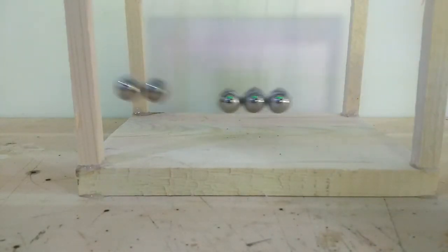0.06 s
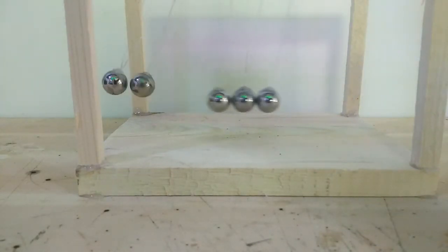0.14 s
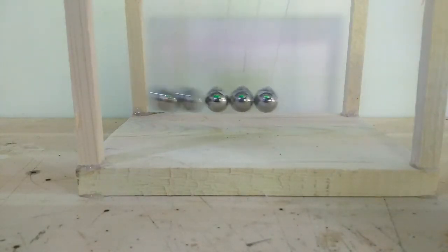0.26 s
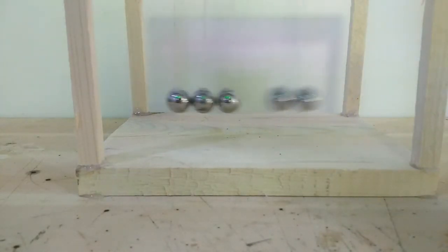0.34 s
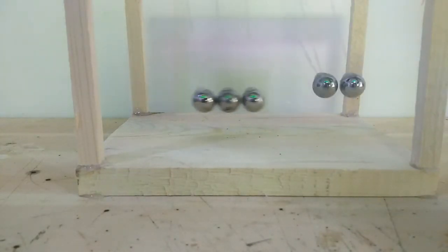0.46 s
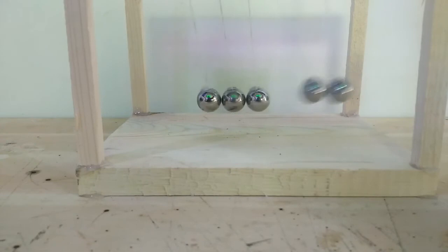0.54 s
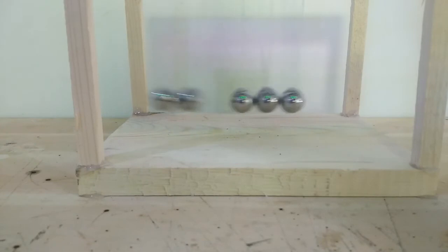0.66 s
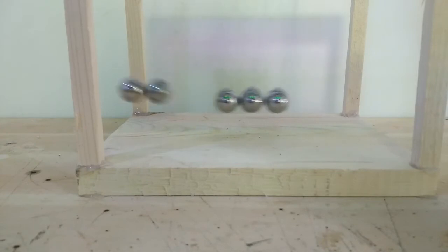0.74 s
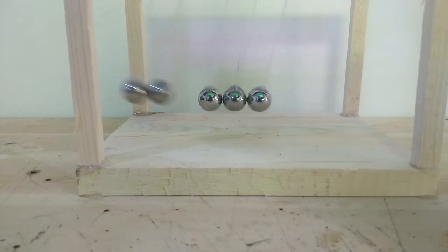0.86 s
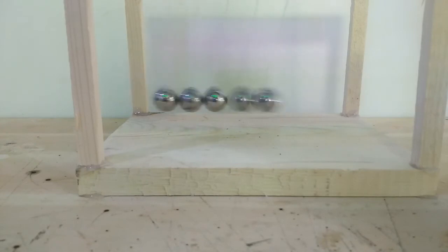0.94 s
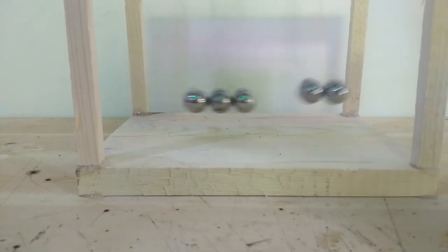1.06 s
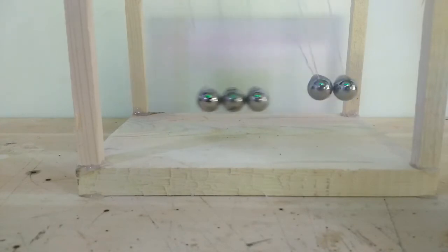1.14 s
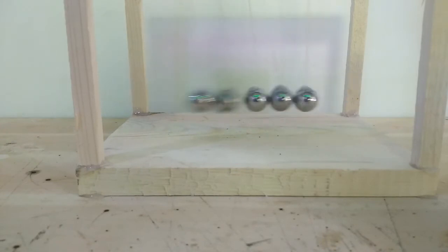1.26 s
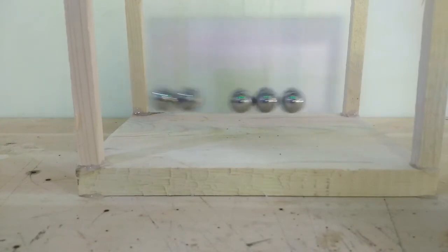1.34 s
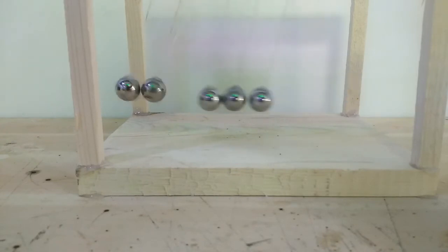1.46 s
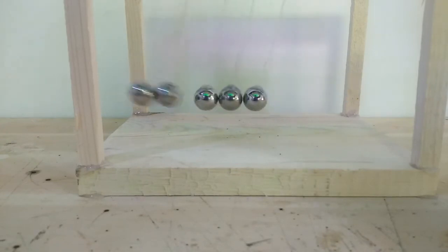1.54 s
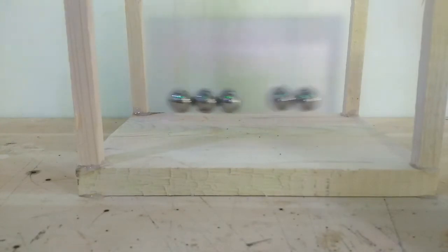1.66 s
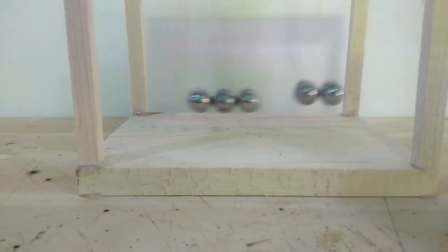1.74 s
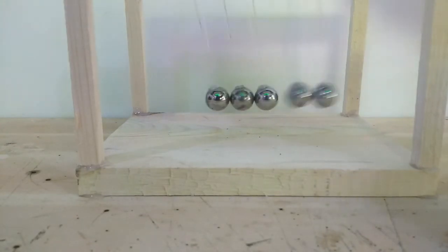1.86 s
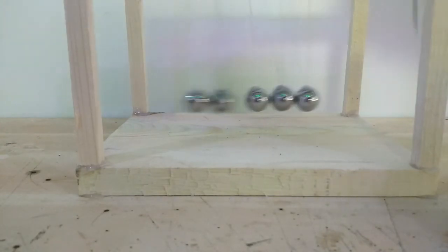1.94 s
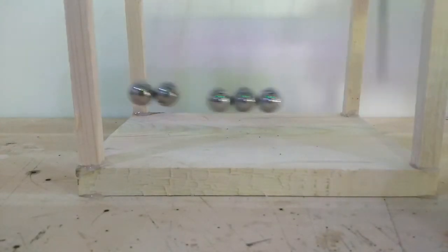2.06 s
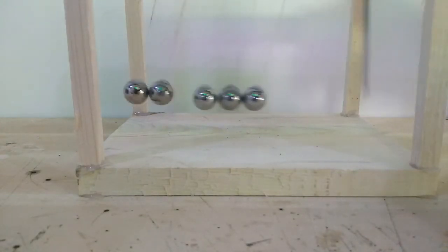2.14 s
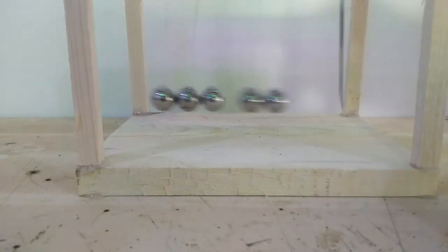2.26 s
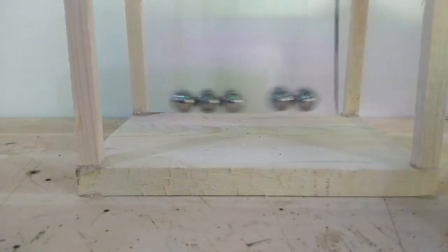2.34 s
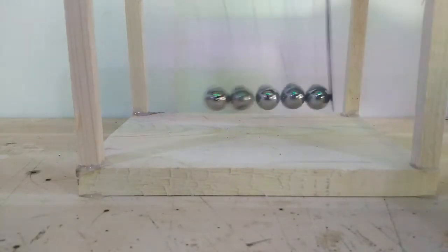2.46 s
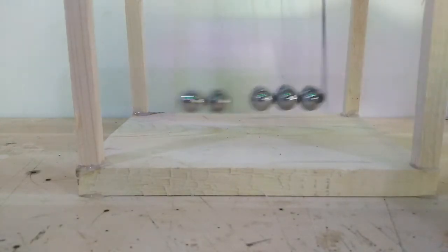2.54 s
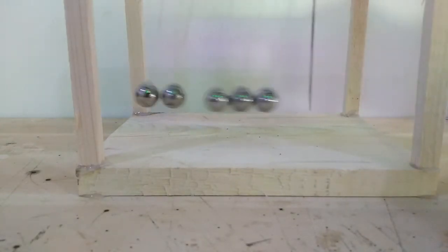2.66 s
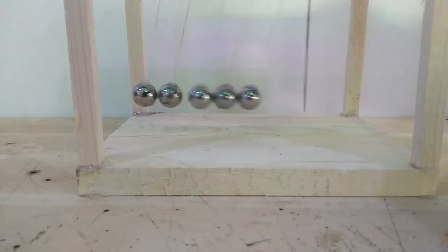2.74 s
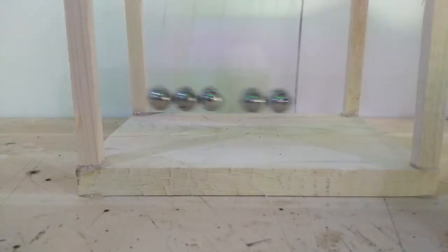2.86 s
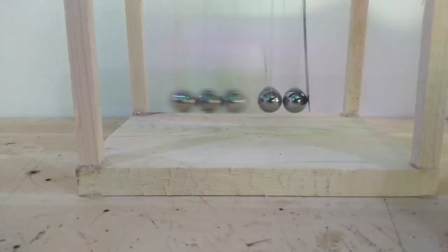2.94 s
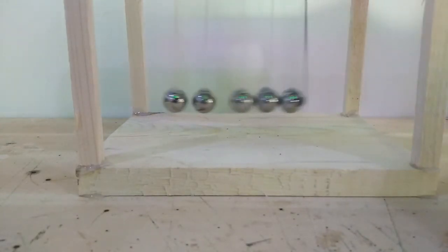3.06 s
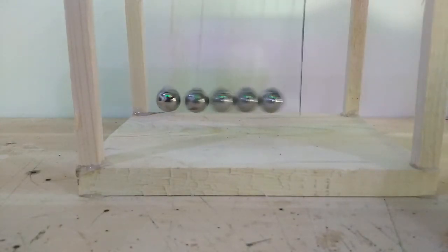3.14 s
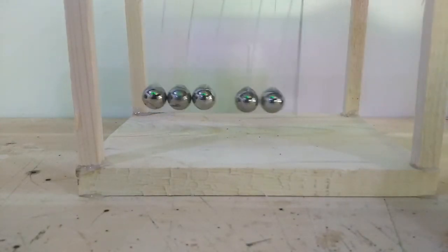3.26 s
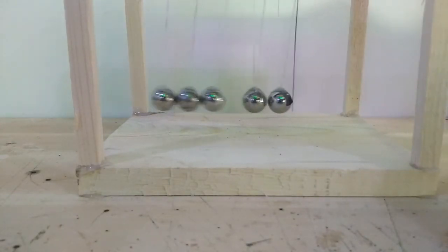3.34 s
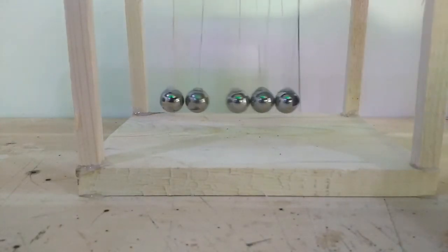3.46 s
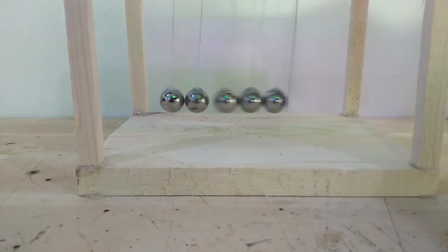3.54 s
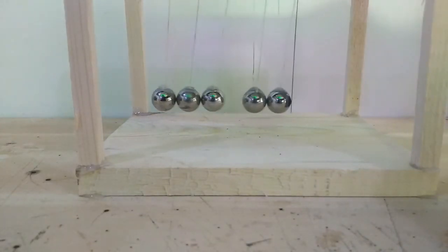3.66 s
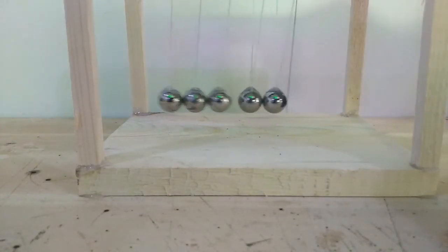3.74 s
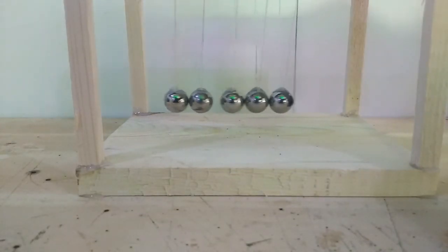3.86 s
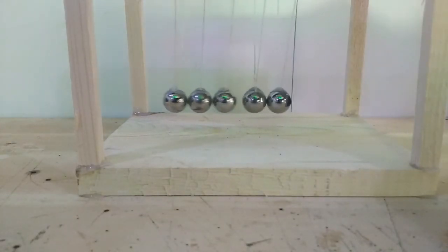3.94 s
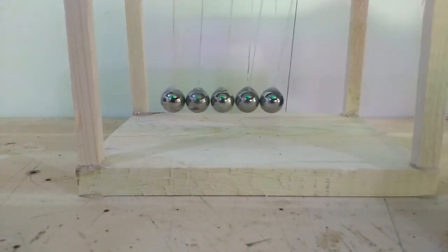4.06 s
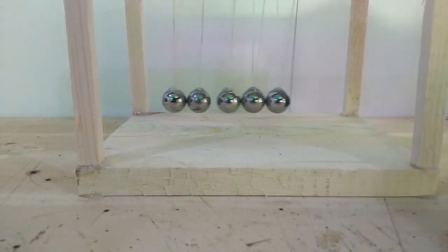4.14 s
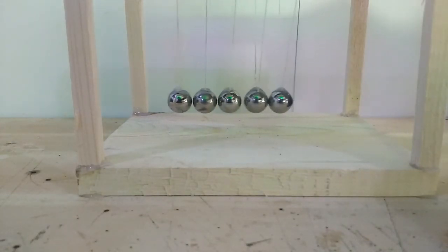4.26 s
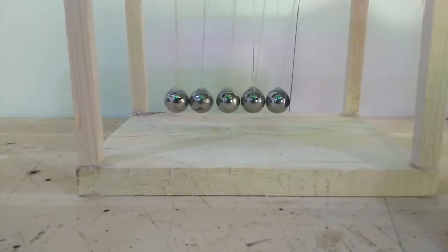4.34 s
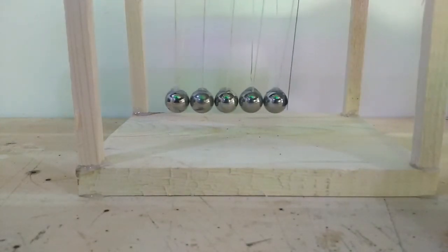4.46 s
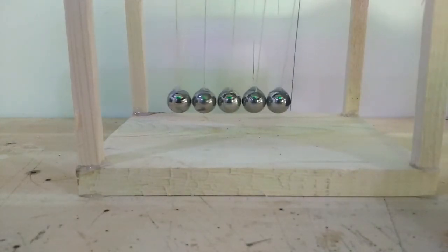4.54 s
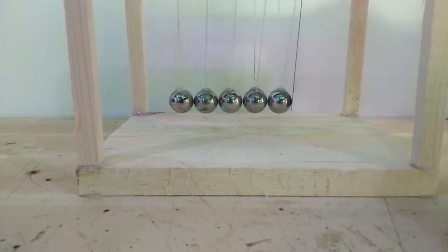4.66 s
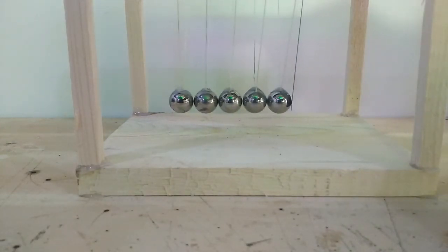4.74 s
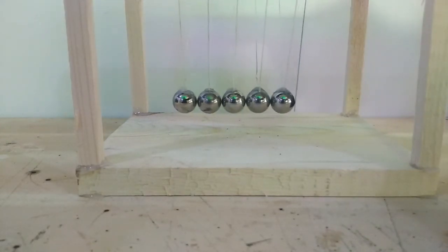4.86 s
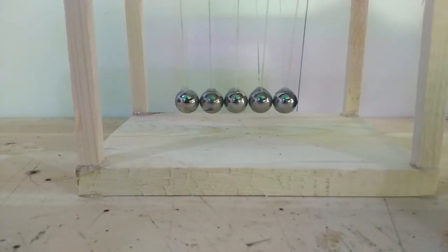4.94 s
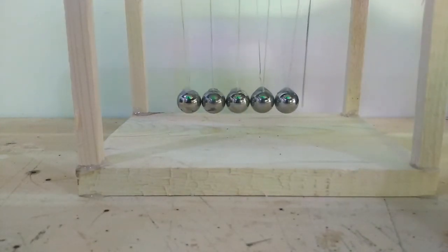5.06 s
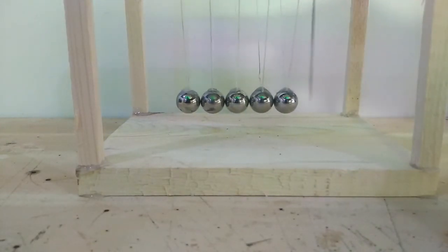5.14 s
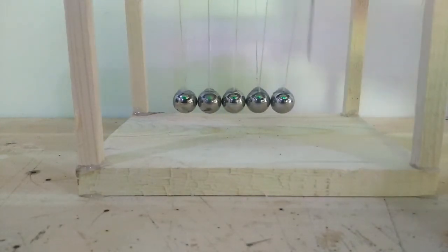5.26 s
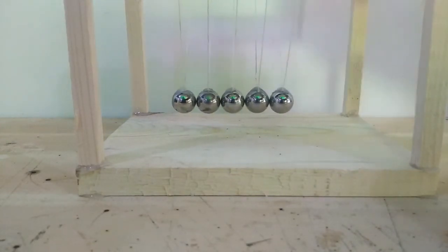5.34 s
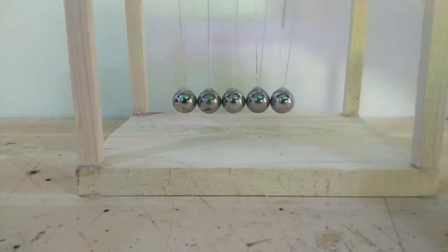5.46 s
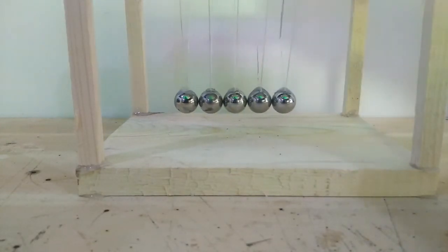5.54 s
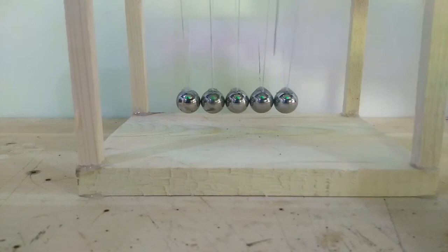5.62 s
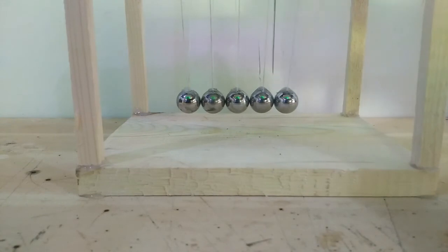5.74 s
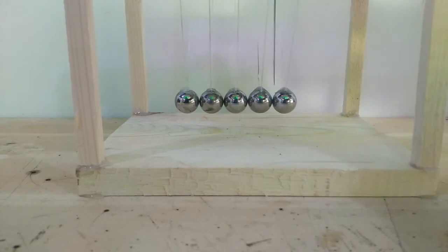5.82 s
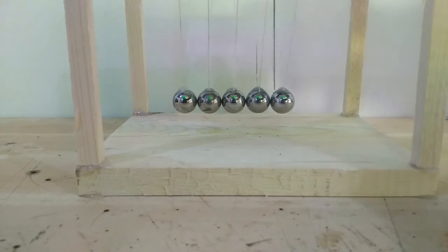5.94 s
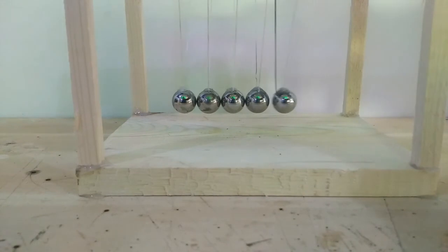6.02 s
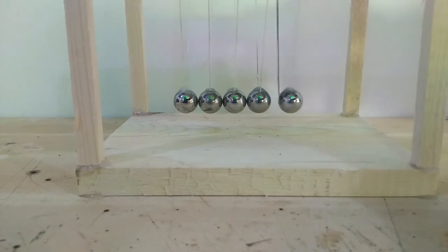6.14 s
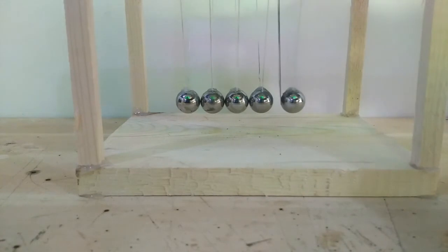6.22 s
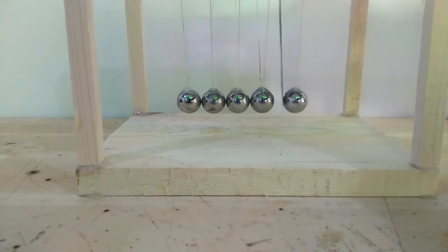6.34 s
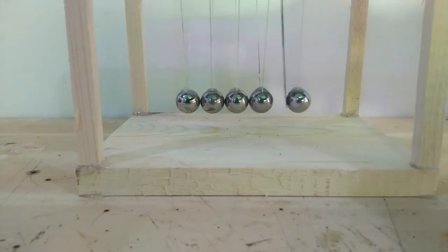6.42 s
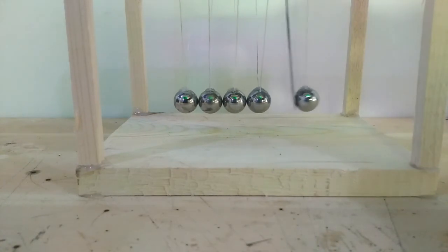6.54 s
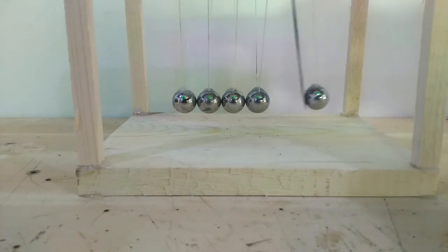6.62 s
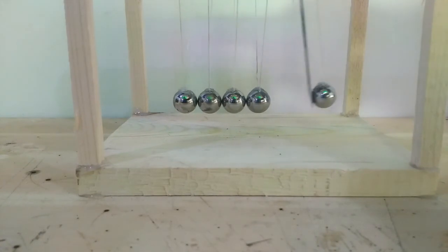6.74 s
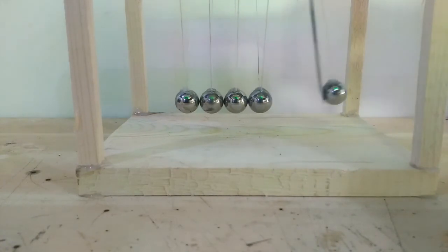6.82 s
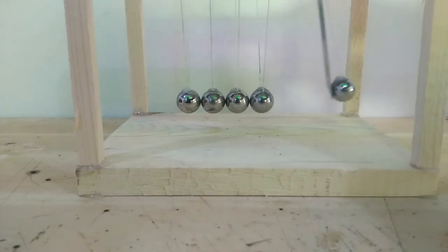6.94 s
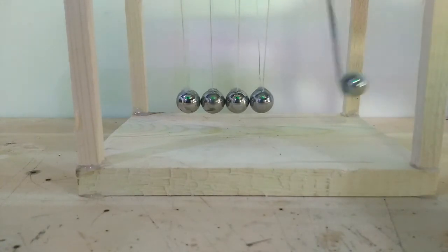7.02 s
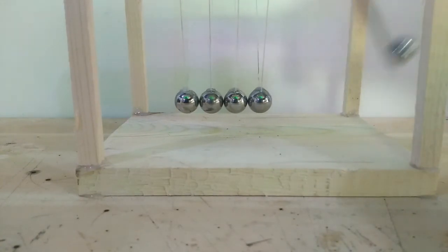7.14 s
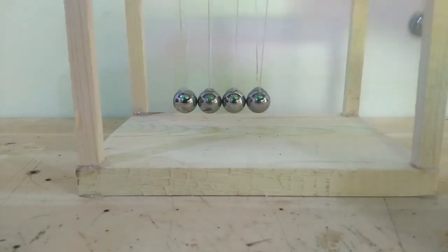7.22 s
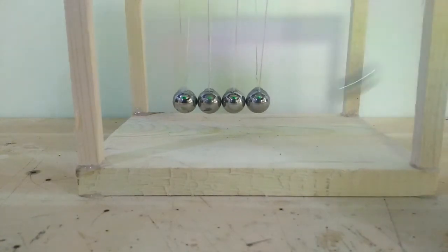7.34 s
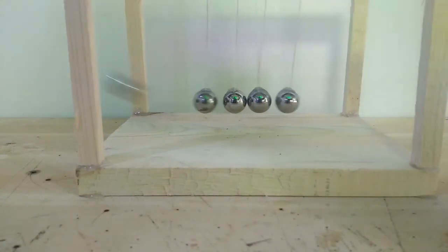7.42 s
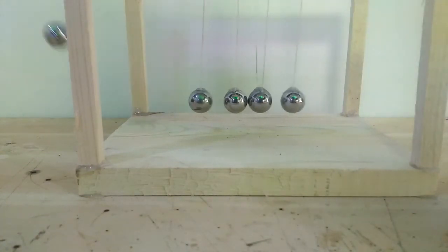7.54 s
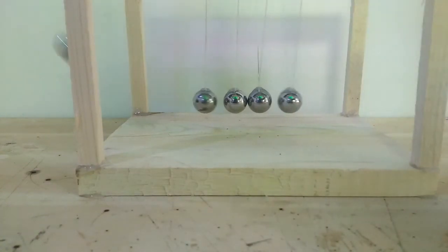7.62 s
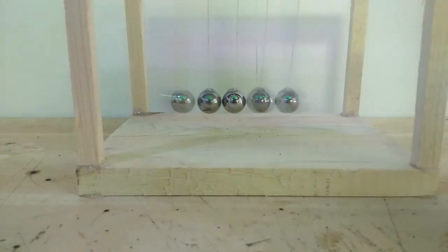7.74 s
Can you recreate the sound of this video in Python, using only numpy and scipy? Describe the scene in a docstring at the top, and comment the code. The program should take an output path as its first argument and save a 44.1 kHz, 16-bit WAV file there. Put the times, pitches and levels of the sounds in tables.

```python
"""A Newton's cradle on a wooden frame clacks on a workbench in a small room, close to the left microphone.
It first swings freely: each collision is a noisy run of steel contacts, then chatter, ringing and a short tail.
A hand stops the swing, bumping the rumbling frame; the balls jostle in irregular knocks and settle.
Last, fingers scrape and rub softly as one ball is lifted and let go, and it knocks again.
Filtered noise gives the contacts, wood, skin and air; decaying sines give the ring."""
import sys
import numpy as np
from scipy import signal
from scipy.fft import rfft, irfft, next_fast_len
from scipy.io import wavfile

SR = 44100
rng = np.random.default_rng(int(sys.argv[2]) if len(sys.argv) > 2 else 0)


def dump(signal):
    """Clip the signal to [-1, 1] and save it as 16-bit WAV at the path in sys.argv[1]."""
    limited = np.clip(np.atleast_2d(signal).T, -1, 1)
    pcm = np.round(limited * 32767).astype(np.int16)
    wavfile.write(sys.argv[1], SR, pcm)


N = 343539
TOP_HZ = 14300  # upper edge of the recorder's passband


def undb(db):
    """Logarithmic level: 20 dB is a factor of ten in amplitude."""
    return 10 ** (np.asarray(db) / 20)


def unit(x):
    """Energy normalisation: the squared samples sum to one."""
    return x / np.sqrt(np.sum(x ** 2) + 1e-18)


def fade(t, t60):
    """Exponential decay: the amplitude falls by 60 dB in t60 seconds."""
    return np.exp(-np.log(1000) * t / t60)


def curve(hz, points):
    """Logarithmic frequency scale: interpolate (Hz, value) points along it."""
    f, value = np.transpose(points)
    return np.interp(np.log(hz + 1), np.log(f), value)


def colour(x, points):
    """Minimum phase: a causal filter derived by cepstrum from the gain of (Hz, dB) points."""
    n = next_fast_len(len(x) + 2048, real=True) * 2
    hz = np.arange(n // 2 + 1) * SR / n
    cepstrum = irfft(np.log(undb(curve(hz, points))))
    # fold the cepstrum onto positive time to make the filter causal
    cepstrum[1:n // 2] *= 2
    cepstrum[n // 2 + 1:] = 0
    response = np.exp(rfft(cepstrum))
    return irfft(rfft(x, n) * response)[:len(x)]


def noise(points):
    """Spectral shaping: white noise is filtered, then scaled to rms 1."""
    return unit(colour(rng.standard_normal(N), points)) * np.sqrt(N)


def add(track, s, x):
    """Superposition: mix x into the track at s seconds."""
    i = int(s * SR)
    track[i:i + len(x)] += x[:N - i]


def swells(rows):
    """Power addition: events (start_s, level_db, rise_s, t60_s) that rise and die away share one envelope."""
    power = np.zeros(N)
    t = np.arange(SR) / SR
    for s, db, rise, t60 in rows:
        attack = np.minimum(t / rise, 1)
        decay = fade(np.maximum(t - rise, 0), t60)
        add(power, s, (undb(db) * attack * decay) ** 2)
    return np.sqrt(power)


# Spectral density of room air and microphone hiss: frequency_hz, left_db_per_hz, right_db_per_hz
AIR_DENSITY = [(30, -104.2, -110.9), (60, -92.5, -104.9), (95, -85.5, -100.0), (170, -85, -99.3),
               (382, -88, -100.5), (480, -90.5, -91), (1050, -95.5, -94.5), (2000, -97.5, -96.5),
               (4694, -101.4, -101.6), (4900, -106.8, -107.7), (9030, -109.9, -113.5),
               (13960, -111.3, -112.2)]


def air():
    """Uncorrelated steady noise: room air and hiss are independent in the two microphones."""
    rows = np.array(AIR_DENSITY)
    sides = [colour(rng.standard_normal(N), rows[:, [0, column]]) for column in (1, 2)]
    return np.array(sides) * np.sqrt(SR / 2)  # density to amplitude over the whole band


# Relative spectrum of rubbing skin: frequency_hz, gain_db
SKIN_COLOUR = [(100, -3.5), (300, -1), (1000, -7.5), (2000, -16), (5000, -23), (8300, -27), (14000, -30)]
# Fingers sliding off the ball: start_s, level_db, rise_s, t60_s
FINGER_RUBS = [(7.27, -65.5, .03, 0.68), (7.48, -51, 0.021, 0.38)]


def fingers():
    """Friction noise: skin rubs softly as the lifted ball is let go."""
    return noise(SKIN_COLOUR) * swells(FINGER_RUBS)


# Relative spectrum of the wooden frame: frequency_hz, gain_db
WOOD_COLOUR = [(25, -17.5), (72, -6.5), (87, 4.5), (102, -7), (120, -3), (135, -10.5), (151, 1),
               (190, -9.5), (420, -18.5), (700, -25), (1200, -23), (2000, -42)]
# Dull bumps of the hand on the frame: start_s, level_db, rise_s, t60_s
HAND_BUMPS = [(3.098, -38, 0.011, 0.35), (3.128, -35.5, 0.016, 0.72), (7.378, -47.5, 0.0077, 0.41)]


def frame(free_db=-41, held_db=-47, rise_s=.035, t60_s=0.55):
    """Structure-borne sound: wood rumbles as strings take up each blow, less once held, and at hand bumps."""
    free = [(s, db + free_db, rise_s, t60_s) for s, db, *_ in free_swing()]
    held = [(s, db + held_db, rise_s, t60_s) for s, db, *_ in HAND_KNOCKS]
    return swells(free + held + list(HAND_BUMPS)) * noise(WOOD_COLOUR)


def room(blow, t60_s=0.22, treble_t60_s=0.17, grain_db=3.5, size=50):
    """Reverberation: patchy reflections build a tail, new each time as the balls are never in the same place."""
    t = np.arange(SR // 3) / SR
    white = rng.standard_normal(len(t))
    low = signal.sosfiltfilt(signal.butter(4, 10500, fs=SR, output="sos"), white)
    # the level is redrawn every `size` samples
    steps = np.repeat(rng.standard_normal(len(t) // size + 1), size)[:len(t)]
    build_up = np.clip((t - .003) / 0.0027, 0, 1)
    decaying = low * fade(t, t60_s) + (white - low) * fade(t, treble_t60_s)
    tail = decaying * undb(grain_db * steps) * build_up
    # the walls hear the blow from all sides, which evens out much of its comb colour
    return unit(tail) + .6 * unit(signal.fftconvolve(tail, blow)[:len(t)])


def patchy(x, spread_db, count=30):
    """Interference: reflections cancel and reinforce at other pitches for every position of the balls."""
    hz = np.linspace(1000, TOP_HZ, count)
    return colour(x, np.c_[hz, spread_db * rng.standard_normal(count)])


# Metallic modes of the cradle: pitch_hz, level_db (before the common ring gain), t60_s
CRADLE_MODES = [(4130, -23, .1), (4530, -23, .1), (6810, -22, .11), (7560, -20, .12), (8130, -18, .11),
                (9620, -22, .1), (12300, -23, .09)]


def ring(x):
    """Modal resonance: convolution with decaying sines rings the short metallic modes of the cradle."""
    t = np.arange(SR // 3) / SR
    modes = np.zeros(len(t))
    for hz, db, t60 in CRADLE_MODES:
        modes += undb(db) * unit(np.sin(2 * np.pi * hz * t) * fade(t, t60))
    return signal.fftconvolve(x, modes)[:N]


def contacts(t, times, sizes, t60):
    """Impact scattering: hard ticks, each scattered at once by the neighbouring balls and the frame."""
    age = t - times[:, None]
    power = sizes[:, None] ** 2 * (age >= 0) * fade(np.abs(age), t60) ** 2
    return unit(np.sqrt(power.sum(0)) * rng.standard_normal(len(t)))


def collision(run_ms, chatter_db, count=6):
    """Momentum transfer: the blow swells as it runs down the row ball by ball; loosened balls then chatter."""
    t = np.arange(SR // 20) / SR
    k = np.arange(count)
    steps = (k + rng.uniform(0, .6, count) * (k > 0)) / count
    sizes = undb(2.1 * rng.standard_normal(count) - 1.7 * (k == 0))  # the first contact tends to be weaker
    blow = contacts(t, steps * run_ms / 1000, sizes, t60=.006)
    later = 0.0044 + 0.014 * (k + rng.random(count)) / count  # seconds
    chatter = contacts(t, later, undb(2.0 * rng.standard_normal(count)), t60=0.013)
    return unit(blow + undb(chatter_db - 2) * chatter)


# Relative spectrum of a steel contact: frequency_hz, gain_db
STEEL_COLOUR = [(300, -44), (700, -31.5), (1300, -24), (2000, -21), (2800, -14), (3700, -12), (4400, -6.5),
                (5500, -11), (6500, -7), (8200, 1.5), (9500, -2), (10700, -7), (12600, -6), (14200, -10.5)]


def steel(x, body_db, treble_db):
    """Spectral tilt: each contact has its own share of body and treble."""
    tilt = [(1500, 1.4 * body_db), (4500, .7 * body_db), (7500, 0), (9300, 0), (12000, treble_db)]
    return unit(colour(colour(x, STEEL_COLOUR), tilt))


# Ceiling of the scattered light touches between the balls: time_s, level_db
TOUCH_LEVEL = [(0, -61), (3.1, -61), (4.8, -48.5), (5.3, -68), (6.0, -66.5), (6.4, -54.5), (6.9, -61.5),
               (7.35, -53), (7.8, -68.5)]
# Spells of dense light ticks: jostling balls, at the end a finger scrape: start_s, end_s, highest_level_db
TICK_SPELLS = [(3.081, 3.265, -36), (3.37, 3.476, -50), (4.741, 4.891, -41), (4.888, 5.179, -49.5),
               (7.26, 7.37, -53.5)]


def touches(count=60, order=8, run_ms=3, body_db=0, treble_db=-7, chatter_db=-9, room_db=-11):
    """Random light impacts: scattered touches and spells of dense ticks, in the columns of the knocks."""
    when, size = rng.random((count, 2)).T
    times = when * (N - 1) / SR
    rows = list(zip(times, np.interp(times, *np.transpose(TOUCH_LEVEL)) - 9 * size))
    for start, end, db in TICK_SPELLS:
        # one tick at a random moment in each of `order` equal slots
        for k, (u, v) in enumerate(rng.random((order, 2))):
            rows.append((start + (end - start) * (k + u) / order, db - 7 * v))
    return [(s, db, run_ms, body_db, treble_db, chatter_db, room_db) for s, db in rows]


# Free swing: one collision per half period; the intervals shrink with the arc and alternate slightly
FIRST_S, HALF_PERIOD_S, QUICKEN_S, LIMP_S = .1449, .3289, .00186, .0008
# settings of the first collision, in the columns of the knocks
FIRST_DB, FIRST_RUN_MS, FIRST_BODY_DB, FIRST_TREBLE_DB = -10, 5.3, -5.5, -3
FIRST_CHATTER_DB, SWING_ROOM_DB = -5.5, -11.5
# change from each collision to the next
LOSS_DB, RUN_LOSS_MS, BODY_GAIN_DB, TREBLE_GAIN_DB, CHATTER_LOSS_DB = 0.88, 0.25, 0.6, 1.5, 2.5


def free_swing(count=8):
    """Damped pendulum: in the columns of the knocks, each collision is softer, shorter and cleaner."""
    k = np.arange(count)
    times = FIRST_S + HALF_PERIOD_S * k - QUICKEN_S * k * (k - 1) / 2 + LIMP_S * (k % 2)
    db = FIRST_DB - LOSS_DB * k
    run_ms = FIRST_RUN_MS - RUN_LOSS_MS * k
    body_db = FIRST_BODY_DB + BODY_GAIN_DB * k
    treble_db = FIRST_TREBLE_DB + TREBLE_GAIN_DB * k
    chatter_db = FIRST_CHATTER_DB - CHATTER_LOSS_DB * k
    room_db = np.full(count, SWING_ROOM_DB)
    return list(zip(times, db, run_ms, body_db, treble_db, chatter_db, room_db))


# Knocks once the hand interferes, all levels relative (fixed offsets and weights are applied in play):
# start_s, level_db, run_ms (length of the contact run), body_db, treble_db, chatter_db, room_db
HAND_KNOCKS = [(2.5679, -22.5, 4.1, 1, 8, -7, -11.5), (2.6623, -9.5, 3.1, -6, -2.5, -2, -15),
               (2.9543, -17, 5.8, 0, 1, -5.5, -14.5), (3.072, -21.5, 2.1, 3, 8, -8, -11.5),
               (3.0997, -24.5, 4.1, -14, -7, -13, -17), (3.13, -27, 3.7, -7, -7, -4, -20),
               (3.154, -24, 6.5, -8, 4, -17, -20), (3.16, -8, 5.3, -3, 0.5, -8.5, -13),
               (3.2346, -31, 4.1, -1, -10, -4, -18), (3.3357, -21, 4.8, -.5, -1.5, 3, -12),
               (3.5008, -25.5, 3.6, 2, -1, -4.5, -22), (3.535, -33.5, 4.9, 2.5, -4, -24, -11),
               (3.5723, -31, 2.8, 1, 10, -11, -2), (3.5883, -11, 5.6, -4.5, 0, -3.5, -14.5),
               (3.7514, -15.5, 4.1, -2.5, -5.5, -9, -12), (3.958, -15.5, 3.3, -5.5, -8.5, -4, -16),
               (4.0994, -15.5, 3.7, -4, -5, -3, -15.5), (4.261, -25.5, 10, -4.5, -2, -2, -15),
               (4.296, -35, 3, 0, -4, -17, -9), (4.4088, -19.5, 5.7, -5.5, -7.5, -8, -15),
               (4.486, -26, 7.1, -0.5, -1, 0, -8.5), (4.6631, -31, 4, -3.5, -5, -5, -13),
               (4.736, -39.5, 2.4, 2.5, -9, -11, -10), (4.756, -33.5, 7.1, 0.5, -6, -1, -16),
               (4.802, -36.5, 5.7, -1, -20, -3, -11), (4.8417, -41, 5, 4, -10, -14, -11),
               (6.3499, -44, 3.6, -12, -2.5, -12, -9.5), (7.349, -42, 6.8, 0, 7, -1, -11.5),
               (7.377, -49.5, 3.8, 25.5, -2.5, -7.5, -19), (7.581, -11, 3.2, 1.5, 3.5, -11, -10),
               (7.598, -20.5, 4.4, 1.5, -3, 1, -18)]


def balls(ring_db=5):
    """Direct and reverberant sound: every collision and touch sounds with its ring and room tail."""
    out, send = np.zeros((2, N))
    events = free_swing() + list(HAND_KNOCKS) + touches()
    for s, db, run_ms, body_db, treble_db, chatter_db, room_db in events:
        blow = collision(run_ms, chatter_db)
        gain = undb(db + 24.5)  # from unit energy to playing level
        clack = steel(blow, body_db, treble_db) * gain
        tail = steel(patchy(room(blow), 2.5), body_db + 5.0, treble_db - 0.5)
        add(out, s, clack)
        add(send, s, clack * undb(room_db))  # room_db also sets how strongly the cradle rings
        add(out, s, tail * gain * undb(room_db + 5.0))
    return out + undb(ring_db) * ring(send)


def scene():
    """Proximity: the right microphone picks up only a faint, filtered share of the toy."""
    left = balls() + frame() + fingers()
    faint = [(90, -15), (300, -24.0), (1500, -25.5), (4000, -32.5), (8500, -50), (13000, -35.5)]
    return np.array([left, colour(left, faint)]) + air()


def record(dry):
    """Saturation and band limiting: the recorder rounds the highest peaks and cuts the top."""
    ceiling = 1.5
    rounded = ceiling * np.tanh(dry / ceiling)
    return signal.sosfilt(signal.ellip(8, .3, 70, TOP_HZ, fs=SR, output="sos"), rounded)


dry = scene()
out = record(dry)
dump(out)
```